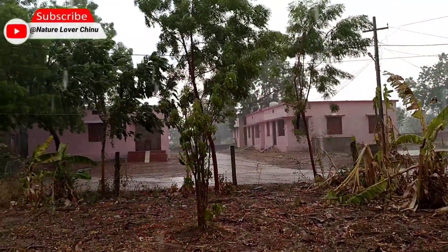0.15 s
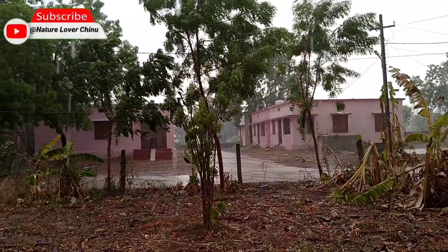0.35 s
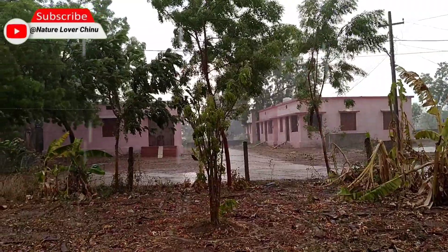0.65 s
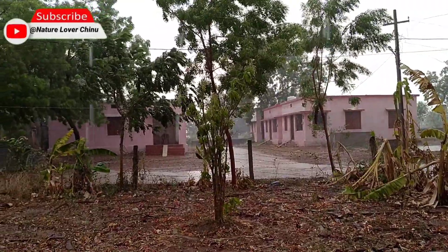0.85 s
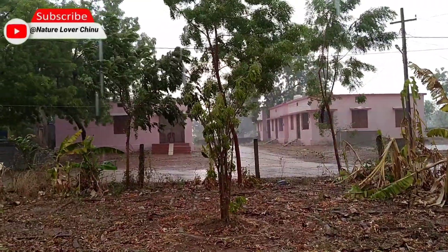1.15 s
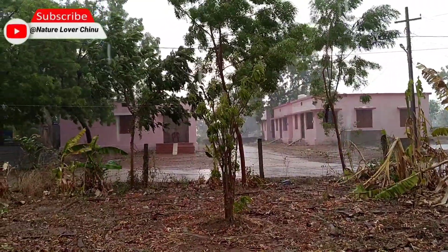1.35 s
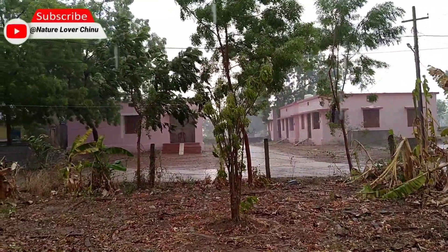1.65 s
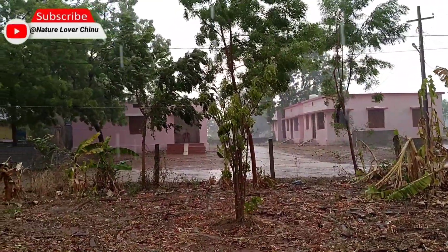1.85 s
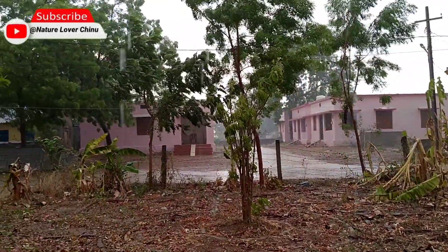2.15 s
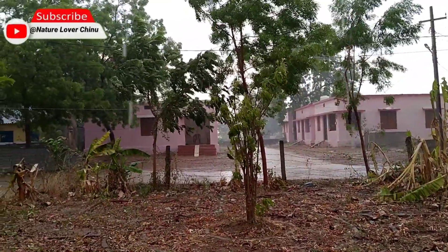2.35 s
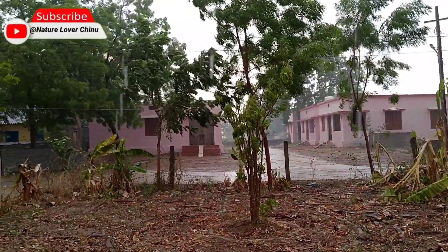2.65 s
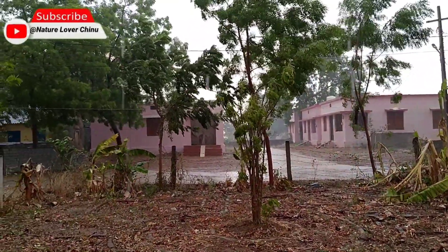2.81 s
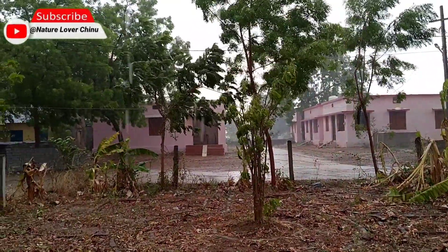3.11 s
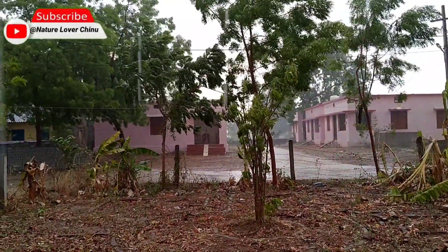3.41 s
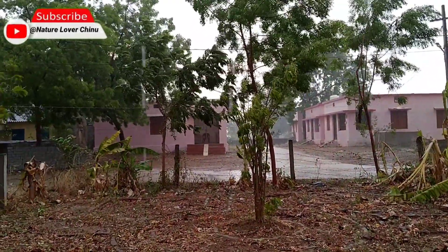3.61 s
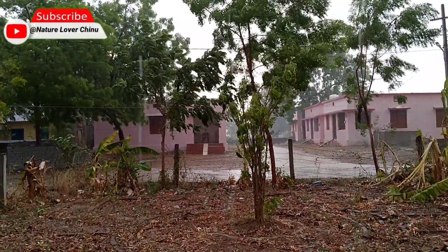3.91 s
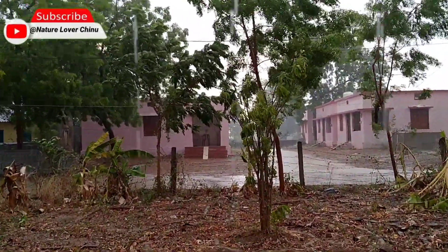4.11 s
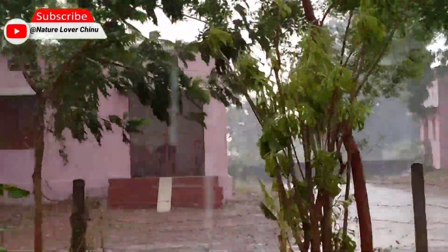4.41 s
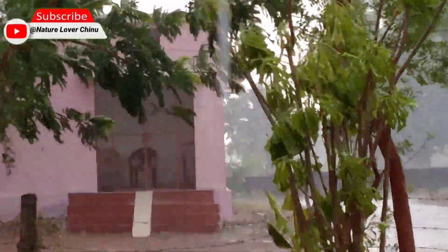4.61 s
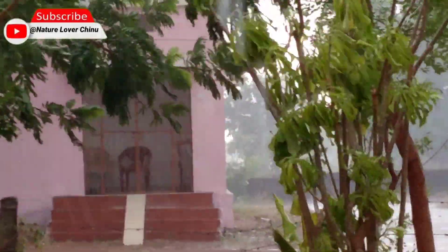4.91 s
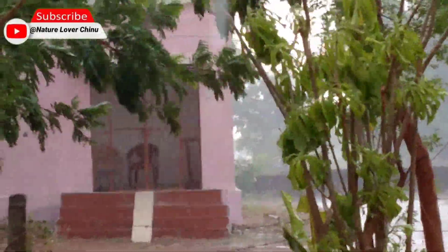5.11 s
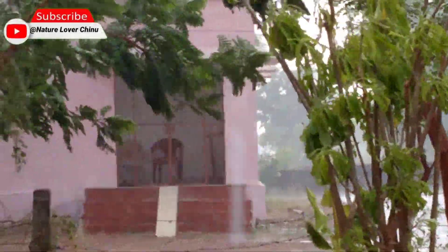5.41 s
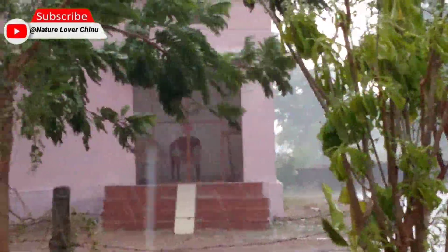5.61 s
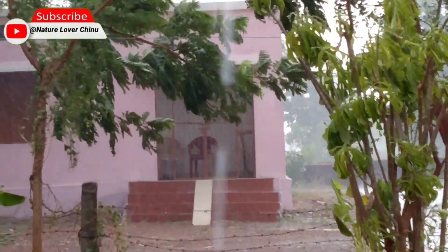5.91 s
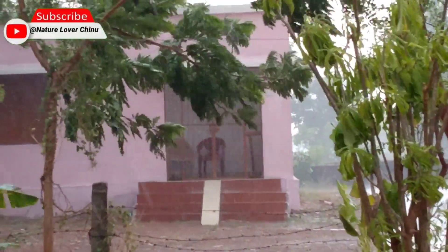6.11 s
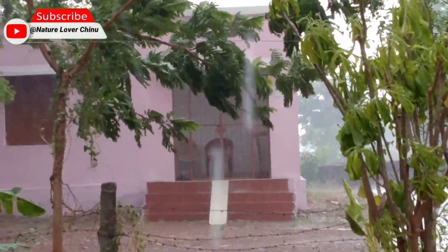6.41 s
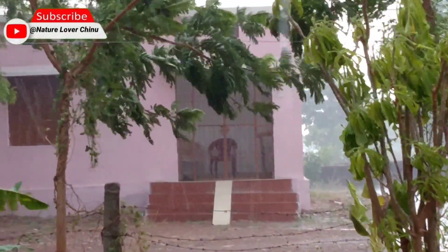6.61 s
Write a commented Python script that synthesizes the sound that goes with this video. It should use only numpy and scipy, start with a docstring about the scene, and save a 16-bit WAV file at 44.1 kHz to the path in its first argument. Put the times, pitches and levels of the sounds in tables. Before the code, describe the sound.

A dense, even rain hiss fills the whole stretch, with light patter and wet ticks close to the listener. Low, uneven thunder rolls far away in the first half, with one short dry knock on a hollow object during it. Then only rain remains, with busier eaves splashes and clicking droplets to the end. Sheltered porch with a short reflection, captured in mono by a phone.

```python
"""Heavy rain from under a roof: first the broad wash of yard and trees, filtered noise in drifting bands.
Nearer drops patter as short noise puffs; water off the eaves splashes close by in lumpy bursts and sharp
ticks, with a wet ringing plop. A roll of distant thunder swells in bass noise, and one heavy drop knocks
on something hollow, ringing its modes. The porch answers the near sounds.
One phone microphone hears it in mono, thin in the bass and closed above 6 kHz."""
import sys
import numpy as np
from scipy import signal
from scipy.io import wavfile
from scipy.ndimage import uniform_filter1d

SR = 44100
rng = np.random.default_rng(int(sys.argv[2]) if len(sys.argv) > 2 else 0)


def int16_out(signal):
    """Quantize to a 16-bit WAV file."""
    q = np.round(np.clip(np.atleast_2d(signal).T, -1, 1) * 32767)
    wavfile.write(sys.argv[1], SR, q.astype(np.int16))


N = 297675

# Far rain, level of each part over time:
# (t/s, wash level/dB, 2.7-3.8 kHz level/dB, 3.8-5 kHz sizzle level/dB, spray above 5 kHz level/dB)
RAIN_LEVELS = [(0.0, -46, -51, -52.5, -45), (0.5, -47, -50.5, -50.5, -44), (0.98, -47, -52.5, -51, -44),
               (1.3, -45, -48, -49, -43.5), (1.6, -44.5, -47.5, -47, -44), (1.88, -45.5, -47.5, -50, -44.5),
               (2.25, -44.5, -49.5, -46, -43.5), (2.6, -44, -48.5, -46.5, -45), (3.1, -45, -49, -44.5, -48),
               (3.6, -46, -52, -49, -50), (4.12, -43.5, -49, -45, -47.5), (4.7, -45, -49.5, -46, -47.5),
               (5.3, -45, -51, -46, -47), (5.8, -46, -52.5, -47.5, -48.5),
               (6.11, -44.5, -48.5, -44.5, -45.5), (6.45, -45.5, -50.5, -47, -47.5),
               (6.75, -45, -50, -46.5, -47.5)]
# Colour of the far rain, relative within each part: (f/Hz, density level/dB per Hz)
RAIN_COLOUR = [(60, -22.5), (122, 1.5), (210, 1.5), (420, -6.5), (850, -4.5), (1150, -5), (1500, -3),
               (2000, -2.5), (2300, 2), (2700, -1.5), (2950, -7), (3250, -5.5), (3900, -2.5), (4500, -6),
               (4800, -5.5), (5150, 1.5), (5450, 5), (5800, 0.5), (6100, 1.5), (8000, -4.5)]
# Edges between roar, wash, upper wash, sizzle and spray: f/Hz
RAIN_PART_EDGES_HZ = [450, 2700, 3800, 5000]
ROAR_DB, PATTER_DB = -8, -8.5   # roar under 450 Hz and nearer drops, relative to the wash

# Louder splashes off the eaves: (t/s, energy level/dB, low edge f/Hz, high edge f/Hz)
EAVES_SPLASHES = [(0.0397, -57, 4600, 6300), (0.2627, -67, 5000, 5950), (0.6877, -58.5, 4660, 6130),
                  (0.9682, -57, 5260, 6200), (1.0156, -62, 3500, 6000), (1.2281, -58.5, 2690, 4080),
                  (1.25, -57.5, 2500, 4330), (1.4496, -63, 4820, 6200), (1.4865, -58, 4560, 6000),
                  (1.5803, -57.5, 5000, 6200), (1.7888, -61, 3170, 4250), (1.9802, -54.5, 2630, 4200),
                  (2.2737, -57, 1690, 3500), (2.4109, -56, 2110, 5460), (2.5716, -57, 1730, 4000),
                  (2.6605, -55, 1500, 3320), (2.6897, -58, 1420, 5030), (2.8397, -55.5, 3600, 5830),
                  (2.9637, -57.5, 2040, 4060), (3.2615, -60, 2200, 3500), (3.7703, -52, 4900, 6760),
                  (3.8404, -57, 4470, 5600), (3.867, -58, 1930, 5750), (3.9715, -56, 1900, 3300),
                  (4.0507, -55.5, 2570, 5670), (4.0791, -56, 4260, 5600), (4.116, -65, 4260, 5750),
                  (4.1683, -57, 1530, 3310), (4.2288, -57, 2050, 2900), (4.251, -60, 4050, 4460),
                  (4.264, -61, 4000, 4460), (4.2956, -56.5, 2050, 4170), (4.4696, -56.5, 1750, 4530),
                  (4.557, -54, 3300, 6000), (4.575, -64, 1800, 3020), (4.605, -58, 2210, 3430),
                  (4.6333, -60, 3500, 5600), (4.6465, -55, 1860, 3300), (4.816, -57, 2030, 5250),
                  (4.9038, -61.5, 1800, 4000), (4.9775, -59, 3800, 5530), (5.1053, -59, 3020, 4400),
                  (5.167, -61, 3000, 5570), (5.1925, -52, 3000, 6630), (5.2256, -55.5, 3300, 6000),
                  (5.283, -58.5, 1680, 2580), (5.291, -61, 2500, 4770), (5.3455, -59.5, 1600, 2600),
                  (5.5977, -58.5, 1800, 3500), (5.931, -57, 3500, 4500), (6.1845, -58.5, 3420, 5940),
                  (6.711, -52, 3000, 6400)]
SPLASH_T60_S = 0.068
SNAP_DB, SNAP_T60_S = 5.5, 0.012   # short extra start, relative to the tail
SMALL_SPLASH_COUNT, SMALL_SPLASH_DB, SMALL_SPREAD_DB = 12, -66, 7   # spread is plus or minus
SMALL_LOW_HZ, SMALL_HIGH_HZ = (1800, 3500), (4200, 6000)   # ranges of the two band edges
PLOP_HZ, PLOP_DB, PLOP_T60_S = 1894, -38.5, 0.069   # the level is a gain on the ringing

# Sharpest single droplets: (crest t/s, peak level/dB, f/Hz, width of each of three resonances/Hz)
DROPLET_TICKS = [(0.264, -28.5, 5440, 1200), (1.4504, -23, 5460, 1600), (1.7896, -28, 3750, 1500),
                 (2.574, -29, 1870, 500), (2.6632, -29, 1640, 800), (2.665, -29, 2650, 1000),
                 (2.667, -31.5, 1900, 450), (2.6625, -26, 3600, 1500), (2.6682, -33, 2630, 900),
                 (2.692, -30, 3300, 1500), (2.697, -30.5, 1480, 900), (2.8403, -26, 4000, 1674),
                 (3.773, -27, 5430, 2055.0), (3.773, -24, 3760, 1630), (3.775, -24.5, 5800, 870.0),
                 (3.777, -24, 5530, 1455.0), (3.974, -27.5, 1800, 900), (3.9753, -32, 2750, 900),
                 (4.053, -27, 3600, 2200), (4.061, -30, 2910, 1100), (4.0809, -19, 5100, 2000),
                 (4.0856, -24.5, 5180, 990.0), (4.1179, -27, 5210, 1125.0), (4.248, -20, 4200, 940),
                 (4.47, -26.5, 5050, 1275.0), (4.4703, -30, 3940, 1035.0), (4.5635, -20.5, 2970, 1665.0),
                 (4.5627, -28, 5300, 1500), (4.5687, -30, 5100, 1410.0), (4.6353, -29, 4600, 1200),
                 (4.6372, -26, 3100, 900), (4.6472, -27, 3300, 1800), (4.905, -32, 4000, 2000),
                 (4.924, -33, 3000, 1500), (4.9795, -21, 4630, 1300), (5.168, -30, 4700, 1200),
                 (5.177, -29, 4700, 1500), (5.1932, -26, 4600, 1695.0), (5.195, -29, 3200, 1500),
                 (5.196, -26, 5540, 1215.0), (5.197, -17, 5810, 1065.0), (5.23, -27, 5300, 1500),
                 (5.346, -32, 3300, 2000), (5.9288, -33, 2800, 1200), (5.9296, -22, 5650, 1190),
                 (5.9314, -23.5, 3900, 700), (6.1867, -24, 5530, 1995.0), (6.7114, -25, 5490, 1400),
                 (6.7128, -22, 4960, 800), (6.7145, -17.5, 5620, 1400), (6.718, -26, 5120, 1000),
                 (6.721, -29, 5200, 1000)]

# Swells of the thunder's boom: (crest t/s, crest level/dB, hold/s)
BOOM_SWELLS = [(1.16, -51, 0.11), (1.26, -46, 0.022), (1.345, -36, .02), (1.39, -34, 0.028),
               (1.47, -33.5, 0.021), (1.515, -36.5, 0.014), (1.61, -48, .02), (1.7, -42, 0.12),
               (1.91, -41.5, 0.044), (2.14, -39.5, 0.018), (2.22, -38, 0.019), (2.3, -40, 0.044),
               (2.38, -46, 0.0089), (2.5, -43.5, 0.0081), (2.59, -45, 0.022), (2.7, -51.5, 0.039),
               (2.82, -52.5, 0.032), (3.01, -52.5, 0.016), (3.19, -57, 0.021)]
BOOM_RISE_DB_PER_S, BOOM_FALL_DB_PER_S = 226, 161.5
# Swells of the upper growl, on its own: (crest t/s, crest level/dB, hold/s)
GROWL_SWELLS = [(1.17, -47.5, 0.14), (1.375, -38.5, 0.026), (1.47, -41.5, 0.042), (1.66, -39.5, 0.04),
                (1.88, -39, 0.022), (2.09, -42.5, 0.032), (2.25, -45, .08), (2.39, -45, 0.016),
                (2.48, -57, .02), (2.58, -53, 0.034), (2.76, -52, 0.034)]
GROWL_RISE_DB_PER_S, GROWL_FALL_DB_PER_S = 140, 99
# Each width is that of one resonance; the noise passes two
BOOM_HZ, BOOM_WIDTH_HZ = 143.2, 23
GROWL_HZ, GROWL_WIDTH_HZ = 196.7, 100
UNDER_HZ, UNDER_WIDTH_HZ, UNDER_DB = 112, 31, -7.5   # undertone, relative to the boom
DISTANCE_CUT_HZ = 333

# Modes of the hollow thing: (click level/dB before softening, f/Hz, t60/s, contact softness width/Hz)
KNOCK_MODES = [(-7, 680, 0.0046, 1350), (-17, 460, 0.009, 470), (-26, 1200, 0.005, 1300),
               (-26, 1700, 0.0045, 1600), (-20.5, 2900, 0.005, 1500), (-26, 4550, 0.0036, 1500),
               (-28, 6600, 0.005, 1200), (-17.5, 4020, 0.0073, 900)]
# Start of each mode after the knock: t/s
KNOCK_MODE_DELAYS_S = [0, 0, 0, .0002, .0002, .0008, .0005, .0027]
# Returns of the knock from near surfaces: (delay t/s, relative level/dB)
KNOCK_RETURNS = [(.006, -20), (.010, -17), (0.015, -18), (0.02, -24), (.024, -22)]
KNOCK_S, KNOCK_CUT_HZ = 2.112, 250   # too small to sound lower

PORCH_T60_S, PORCH_DB = 0.54, -12
# Microphone: bass cut, steep treble cut, faint shelf above it, final cut
BASS_CUT_HZ, TREBLE_CUT_HZ, LEAK_DB, LEAK_CUT_HZ, CUTOFF_HZ = 80, 6260, -33.5, 7960, 8400


def from_db(db):
    """Decibels to gain."""
    return 10 ** (np.asarray(db) / 20)


def rms_one(x):
    """Scale to rms 1."""
    return x / np.sqrt(np.mean(x ** 2) + 1e-20)


def in_time(rows):
    """Each column of a curve table, sample by sample."""
    s, *columns = np.transpose(rows)
    return [np.interp(np.arange(N) / SR, s, column) for column in columns]


def butter(x, hz, kind, order):
    """Butterworth filter."""
    return signal.sosfilt(signal.butter(order, hz, kind, fs=SR, output="sos"), x)


def drift(pole_hz):
    """Slow chance of spread 1: coarse noise twice through a one-pole low-pass."""
    step = 40   # samples between coarse points
    r = np.exp(-2 * np.pi * step * pole_hz / SR)
    coarse = rng.standard_normal(N // step + 2002)
    slow = signal.lfilter([1], [1, -2 * r, r * r], coarse)[2000:]   # drop the filter's start-up
    return np.interp(np.arange(N) / step, np.arange(len(slow)), rms_one(slow))


def resonance(x, hz, width_hz):
    """Two-pole band, gain 1 on top."""
    r = np.exp(-np.pi * width_hz / SR)
    poles = [1, -2 * r * np.cos(2 * np.pi * hz / SR), r * r]
    return signal.lfilter([(1 - r * r) / 2, 0, (r * r - 1) / 2], poles, x)


def ring(clicks, hz, t60):
    """A unit click sets a dying sine of starting height 1 ringing."""
    r = from_db(-60 / (t60 * SR))
    w = 2 * np.pi * hz / SR
    return signal.lfilter([0, np.sin(w)], [1, -2 * r * np.cos(w), r * r], clicks + 1e-18)


def click(s, db):
    """One impulse."""
    x = np.zeros(N)
    x[round(s * SR)] = from_db(db)
    return x


def wash(parts_db, patchy_db, flicker_db):
    """Countless far drops merge to noise; narrow bands swell together and flicker alone."""
    parts = np.zeros((5, N))
    together = drift(5)
    edges = 50 * 2 ** (np.arange(45) / 6)   # six bands an octave
    white = rng.standard_normal((2, N + 4000))   # neighbouring bands take different noise
    hz, db = np.transpose(RAIN_COLOUR)
    for k, (low, high) in enumerate(zip(edges, edges[1:])):
        centre = np.sqrt(low * high)
        movement = min(centre / 3000, 1)   # the low bands move less
        grain_db = movement * (patchy_db * together + flicker_db * drift(15))
        band = butter(white[k % 2], [low, high], "band", order=3)[-N:]   # filter already ringing
        colour_db = np.interp(np.log(centre), np.log(hz), db)
        parts[np.searchsorted(RAIN_PART_EDGES_HZ, centre)] += band * from_db(colour_db + grain_db)
    return sum(from_db(level_db) * rms_one(part) for level_db, part in zip(parts_db, parts))


def patter(level_db, per_s, spread_db, t60, low_hz, high_hz, share, count=10):
    """Nearer drops come at random; each is a puff of noise that dies fast, in one of several bands."""
    born = rng.random(N) < per_s * from_db(3 * drift(3)) / SR   # the rate itself drifts
    sizes = born * from_db(spread_db * np.minimum(rng.exponential(1, N), 4))
    dealt = rng.integers(0, count, N)   # which band each drop falls in
    spray = rng.standard_normal(N)
    fade = from_db(-60 / (t60 * SR))
    out = 0
    for k, hz in enumerate(np.geomspace(low_hz, high_hz, count)):
        puffs = spray * signal.lfilter([1], [1, -fade], sizes * (dealt == k) + 1e-18)
        out = out + resonance(puffs, hz, share * hz)   # width as a share of the centre
    return from_db(level_db) * rms_one(out)


def small_splashes():
    """Rows of fainter splashes at random times, levels and bands."""
    when, size, low, high = rng.random((SMALL_SPLASH_COUNT, 4)).T
    levels_db = SMALL_SPLASH_DB + SMALL_SPREAD_DB * (2 * size - 1)
    low_hz = np.interp(low, [0, 1], SMALL_LOW_HZ)
    high_hz = np.interp(high, [0, 1], SMALL_HIGH_HZ)
    return list(zip(when * N / SR, levels_db, low_hz, high_hz))


def splashes(spatter_db, rise_s, crack_db, crack_t60):
    """A run of water lands and breaks into uneven droplets: a lumpy, dying burst in a band of its own."""
    out = np.zeros(N + 9000)
    t = np.arange(9000) / SR
    rows = [*EAVES_SPLASHES, *small_splashes()]
    chance = rng.standard_normal((len(rows), 2, len(t)))
    decay = from_db(-60 * t / SPLASH_T60_S) + from_db(SNAP_DB - 60 * t / SNAP_T60_S)
    envelope = (1 - np.exp(-t / rise_s)) * decay
    for (s, db, low_hz, high_hz), (noise, lump) in zip(rows, chance):
        lumpy = from_db(spatter_db * np.repeat(lump, 50)[:len(t)])   # a new level every 50 samples
        burst = butter(noise * lumpy * envelope, [low_hz, high_hz], "band", order=2)
        # the broad impact, its peak set against the burst's
        crack = butter(lump * from_db(-60 * t / crack_t60), [1800, 6500], "band", order=2)
        burst += from_db(crack_db) * crack * np.abs(burst).max() / np.abs(crack).max()
        unit_energy = burst / np.sqrt(np.sum(burst ** 2) / SR)
        out[round(s * SR):][:len(t)] += from_db(db) * unit_energy
    return out[:N]


def plop(eaves):
    """Something wet under the eaves rings along with the splashes, most with those near its pitch."""
    return from_db(PLOP_DB) * ring(eaves, PLOP_HZ, PLOP_T60_S)


def ticks():
    """A single droplet: one click through a broad resonance three times, over in a few cycles."""
    out = np.zeros(N + 500)
    impulse = np.eye(1, 500)[0]
    for s, db, hz, width_hz in DROPLET_TICKS:
        tick = impulse
        for _ in range(3):
            tick = resonance(tick, hz, width_hz)
        height = np.abs(tick)
        start = round(s * SR) - height.argmax()   # the crest falls on the given time
        out[start:][:len(tick)] += from_db(db) * tick / height.max()
    return out[:N]


def swells(rows, rise_db_per_s, fall_db_per_s):
    """Gain of overlapping swells, added in power: each rises, holds and falls away."""
    t = np.arange(N) / SR
    power = 0
    for s, db, hold in rows:
        rise_db = rise_db_per_s * np.maximum(s - t, 0)
        fall_db = fall_db_per_s * np.maximum(t - s - hold, 0)
        power = power + from_db(db - rise_db - fall_db) ** 2
    return np.sqrt(power)


def rumble(hz, width_hz):
    """A band of bass noise as distance leaves it, its own unevenness halved in dB, rms 1."""
    band = resonance(resonance(rng.standard_normal(N), hz, width_hz), hz, width_hz)
    band = butter(band, DISTANCE_CUT_HZ, "low", order=6)
    local_rms = np.sqrt(uniform_filter1d(band ** 2, size=3000) + 1e-12)
    return rms_one(band / local_rms ** 0.5)   # long rolls keep a more even pressure


def thunder():
    """Distance leaves only the bass: a boom with a duller undertone and an upper growl, in uneven swells."""
    boom = rumble(BOOM_HZ, BOOM_WIDTH_HZ)
    growl = rumble(GROWL_HZ, GROWL_WIDTH_HZ)
    undertone = from_db(UNDER_DB) * rumble(UNDER_HZ, UNDER_WIDTH_HZ)
    boom_gain = swells(BOOM_SWELLS, BOOM_RISE_DB_PER_S, BOOM_FALL_DB_PER_S)
    growl_gain = swells(GROWL_SWELLS, GROWL_RISE_DB_PER_S, GROWL_FALL_DB_PER_S)
    return boom_gain * (boom + undertone) + growl_gain * growl


def knock():
    """A heavy drop's soft contact sets each hollow mode ringing; near surfaces send it back."""
    out = 0
    for delay, (db, hz, t60, soft_hz) in zip(KNOCK_MODE_DELAYS_S, KNOCK_MODES):
        s = KNOCK_S + delay
        blows = click(s, db)
        for lag, echo_db in KNOCK_RETURNS:
            blows += click(s + lag, db + echo_db)
        out = out + resonance(ring(-blows, hz, t60), hz, soft_hz)
    return butter(out, KNOCK_CUT_HZ, "high", order=2)


def porch(x):
    """Walls and roof answer with a short dense tail of unit energy, after a 3 ms gap."""
    t = np.arange(SR // 2) / SR
    tail = rng.standard_normal(len(t)) * from_db(-60 * t / PORCH_T60_S) * (t > .003)
    return signal.fftconvolve(x, tail / np.sqrt(np.sum(tail ** 2)))[:N]


def scene():
    """Far rain and thunder dry, near water with the porch's answer, all into one microphone."""
    wash_db, upper_db, sizzle_db, spray_db = in_time(RAIN_LEVELS)
    parts_db = [wash_db + ROAR_DB, wash_db, upper_db, sizzle_db, spray_db]
    far_rain = wash(parts_db, patchy_db=.5, flicker_db=1.24)
    drops = patter(wash_db + PATTER_DB, per_s=140, spread_db=5.5, t60=0.021,
                   low_hz=1800, high_hz=6200, share=0.46)
    eaves = splashes(spatter_db=6.0, rise_s=0.003, crack_db=-5, crack_t60=0.052)
    near = drops + eaves + plop(eaves) + ticks() + knock()
    far = far_rain + thunder()
    mono = near + from_db(PORCH_DB) * porch(near) + far
    return np.array([mono, mono])


def record(dry):
    """The microphone: bass rolls off; the treble drops steeply to a faint shelf, then is cut."""
    x = butter(dry, BASS_CUT_HZ, "high", order=3)
    body = butter(x, TREBLE_CUT_HZ, "low", order=20)
    shelf = from_db(LEAK_DB) * butter(x, LEAK_CUT_HZ, "low", order=30)
    final_cut = signal.cheby2(14, 40, CUTOFF_HZ, fs=SR, output="sos")
    return signal.sosfilt(final_cut, body + shelf)


dry = scene()
out = record(dry)
int16_out(out)
```